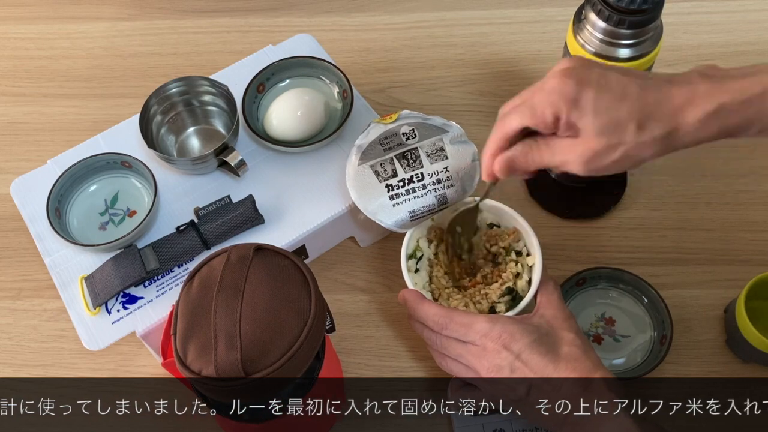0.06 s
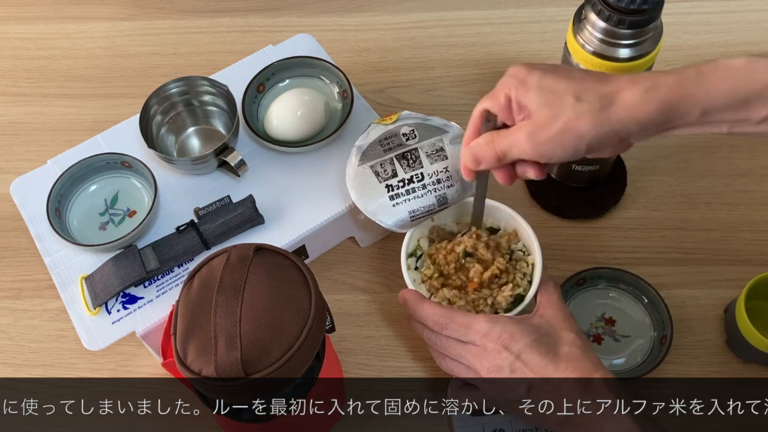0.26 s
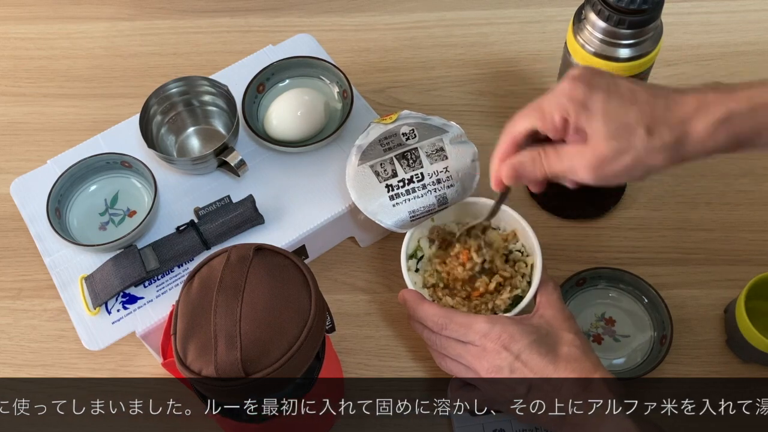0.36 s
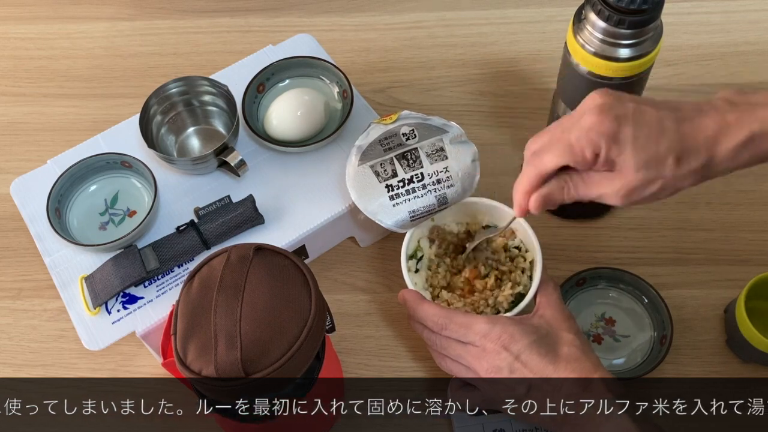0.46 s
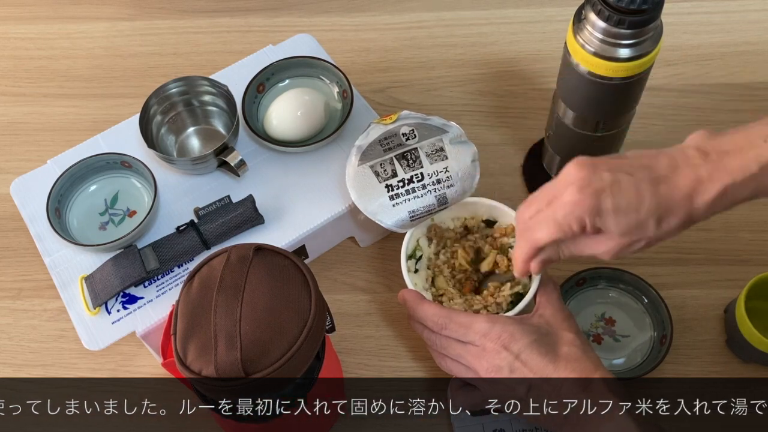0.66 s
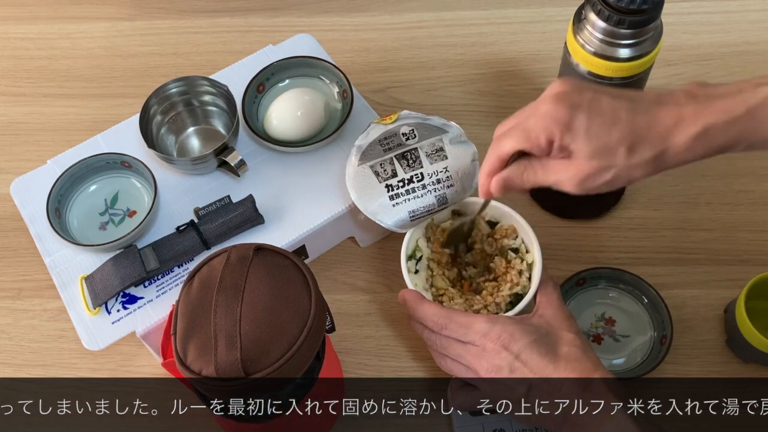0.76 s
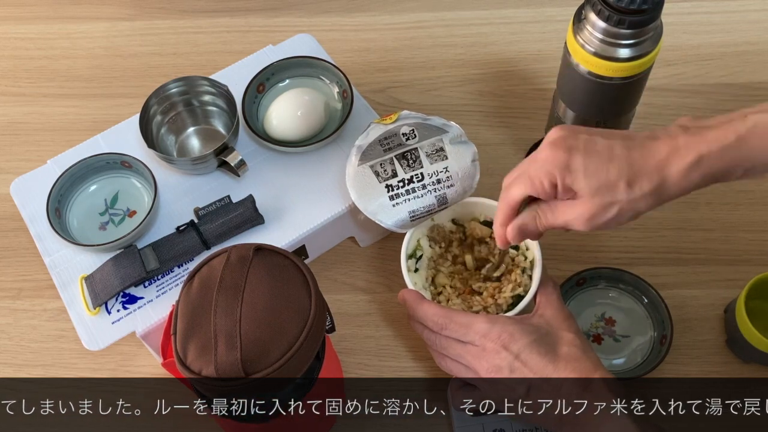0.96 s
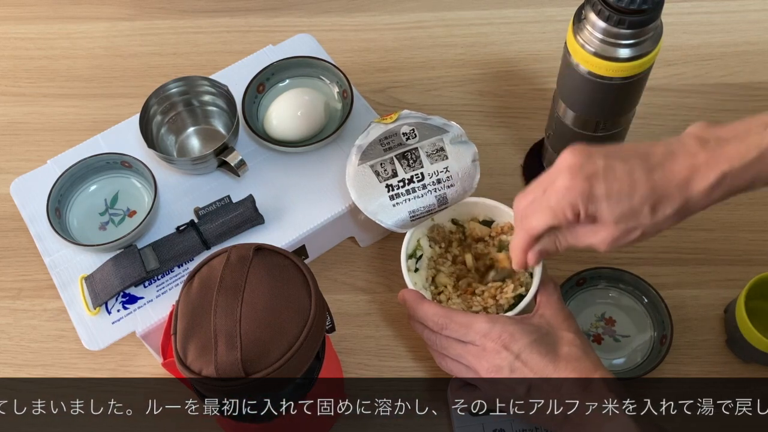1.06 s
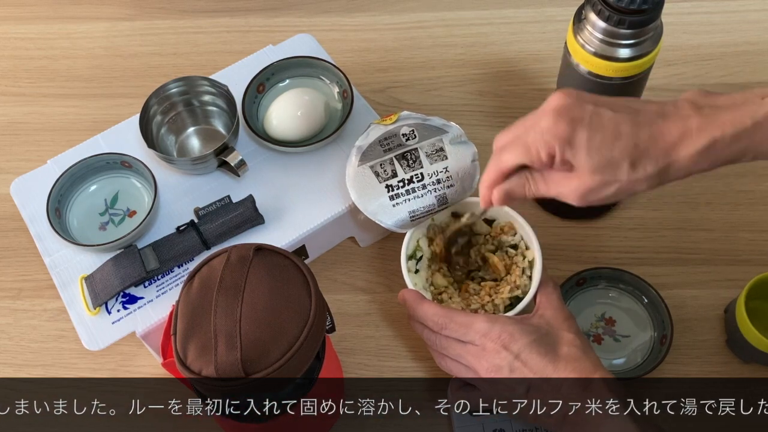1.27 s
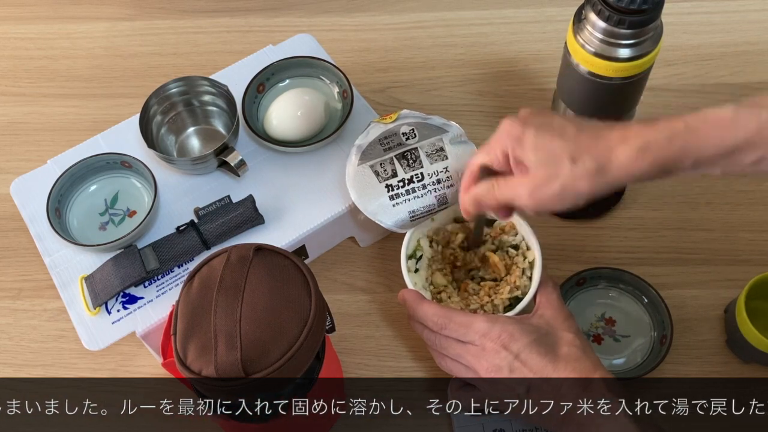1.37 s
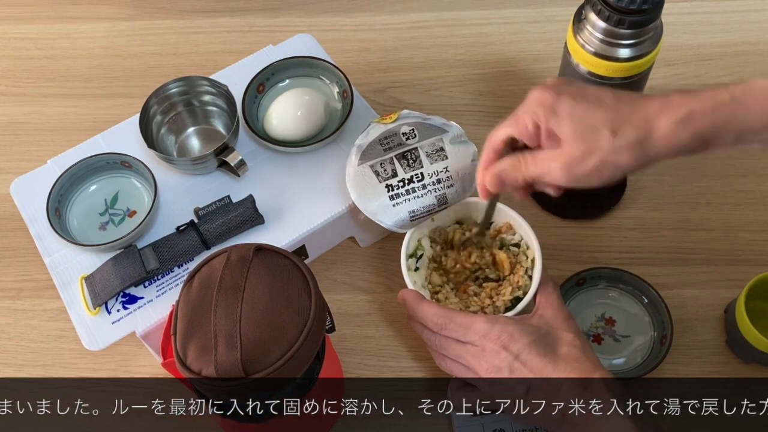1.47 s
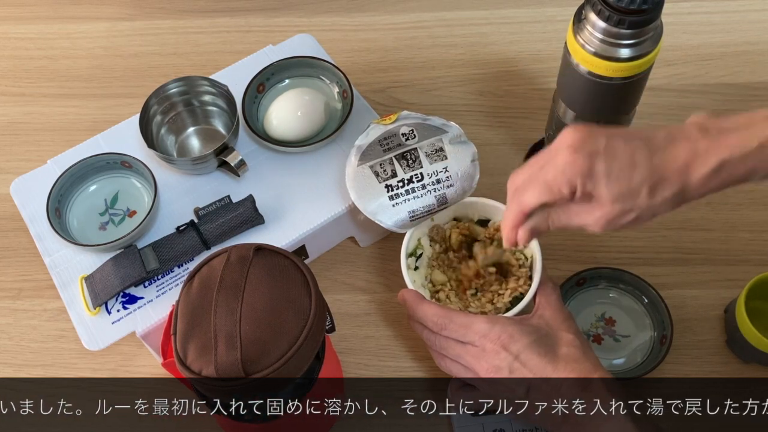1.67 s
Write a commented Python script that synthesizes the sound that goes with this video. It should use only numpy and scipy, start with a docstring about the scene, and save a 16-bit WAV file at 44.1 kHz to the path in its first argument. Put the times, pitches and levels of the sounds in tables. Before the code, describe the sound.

A spoon stirs moist rice in a paper cup, close by in a quiet room. Short scrapes and sharp ticks sound over the faint crackle of sticky grains, and near the end the cup bumps softly on the table.

```python
"""Stirring rice in a paper cup.

A spoon sticks and slips along the paper wall: short scrapes and sharp ticks ring the cup.
The moist rice churns and crackles as its sticky grains part. The cup presses on the table,
later bumps it, and the top thuds. The room is quiet, with a short tail."""
import sys
import numpy as np
from scipy import signal
from scipy.fft import rfft, irfft, next_fast_len
from scipy.io import wavfile

SR = 44100
rng = np.random.default_rng(int(sys.argv[2]) if len(sys.argv) > 2 else 0)


def digitize_waveform(pressure):
    """Quantize a signal to 16-bit integers and store it at the path in sys.argv[1].

    Rows of a 2-D input are taken as channels; values are limited to [-1, 1].
    """
    field = np.atleast_2d(pressure).T
    bounded = np.clip(field, -1, 1)
    quanta = np.round(bounded * 32767).astype(np.int16)
    wavfile.write(sys.argv[1], SR, quanta)


N = 74970
TIME_S = np.arange(N) / SR

# Spectra of room air, rice pops, rice churn. Each row: frequency in Hz, relative level in dB.
AIR_SPECTRUM = [(20, -38), (42, -26), (68, -4), (105, 0), (160, -4), (220, -3), (300, -6), (400, -13),
                (900, -22), (2000, -32), (6000, -33), (11000, -38), (16000, -31)]
CRACKLE_SPECTRUM = [(800, -16), (1600, -5), (2500, -1), (4500, -6), (6500, -7), (9000, -1), (11000, -9),
                    (13500, 0), (16000, 1)]
CHURN_SPECTRUM = [(40, -25), (150, -5), (300, 1), (600, 1), (900, -1), (1500, -8), (3000, -18), (8000, -32)]
# Envelopes of rice pops and churn. Each row: time in seconds, relative level in dB.
CRACKLE_ENVELOPE = [(0, -67), (.05, -67), (.09, -68), (.125, -59), (.195, -58), (.206, -50), (.225, -64),
                    (.285, -77), (.342, -63), (.385, -79), (.425, -66), (.452, -74), (.47, -60), (.5, -79),
                    (.555, -79), (.574, -67), (.592, -72), (.61, -65), (.68, -70), (.703, -63), (.735, -77),
                    (.77, -67), (.799, -70), (.806, -58), (.875, -70), (.896, -59), (.925, -77),
                    (.952, -58), (.985, -77), (1.05, -82), (1.08, -69), (1.225, -71), (1.245, -57),
                    (1.285, -81), (1.34, -55), (1.368, -68), (1.412, -54), (1.45, -72), (1.52, -79),
                    (1.548, -57), (1.59, -66), (1.65, -68), (1.672, -63), (1.7, -76)]
CHURN_ENVELOPE = [(0, -70), (.2, -67), (.35, -68), (.55, -70), (.63, -65), (.74, -72), (.84, -65),
                  (1.04, -71), (1.18, -68), (1.3, -72), (1.44, -65), (1.52, -70), (1.7, -68)]
# Spoon drags. Each row: peak time in seconds, relative rasp level in dB, rasp pitch in Hz,
# relative wall push in dB, rise and fall in seconds (each over 20 dB).
SPOON_DRAGS = [(.038, -53, 1900, -58, .007, .06), (.120, -52, 6500, -71, .03, .06),
               (.186, -55, 5500, -66, .13, .03), (.2085, -27, 4400, -38, .008, .016),
               (.342, -56, 3100, -68, .02, .025), (.422, -51, 4600, -64, .018, .035),
               (.468, -56, 5000, -69, .008, .03), (.538, -61, 3200, -76, .012, .02),
               (.616, -60, 2500, -59, .022, .08), (.672, -61, 3100, -72, .02, .05),
               (.806, -55, 2400, -60, .005, .11), (.892, -48, 2700, -69, .02, .025),
               (.954, -42, 4000, -67, .025, .027), (1.215, -56, 3500, -68, .05, .05),
               (1.2455, -42.5, 3800, -62, .013, .015), (1.334, -50, 2900, -59, .009, .04),
               (1.356, -54, 2000, -46, .005, .028), (1.418, -36.5, 3500, -47, .015, .028),
               (1.475, -57, 2700, -69, .02, .022), (1.554, -53, 3400, -61, .025, .032),
               (1.574, -55, 3000, -70, .01, .06), (1.666, -52.5, 2700, -54, .006, .04)]
# Spectra of paper rasp and hollow wall push. Each row: frequency in Hz, relative level in dB.
RASP_SPECTRUM = [(300, -16), (1000, -13), (1700, -10), (2350, 2), (3200, -.5), (4000, 0), (5500, -6),
                 (7500, -3), (9300, -1), (11000, -14), (16000, -9)]
PUSH_SPECTRUM = [(80, -15), (200, -3), (380, -9), (560, 1), (850, 0), (1020, -9), (1200, -1), (1900, -8),
                 (4000, -30)]
# Modes of cup plus spoon. Each row: frequency in Hz, relative gain in dB, T60 in seconds.
CUP_MODES = [(560, -2, .05), (720, 0, .05), (815, -1, .06), (1220, 4, .08), (2100, 2, .05), (2410, 1, .06),
             (2546, 5, .07), (2769, 0, .06), (3143, 1, .09), (3462, 2, .1), (3686, 3, .08), (4098, 5, .06),
             (4313, 2, .08), (4975, 2, .06), (6860, 5, .08), (7420, 2, .06), (7990, 5, .08), (9290, 3, .05)]
# Single slips, sticky pops, wall knocks. Each row: start in seconds, relative peak in dB, pitch in Hz.
WALL_TICKS = [(.1018, -37, 14500), (.1195, -37, 6000), (.1353, -31, 13500), (.2053, -15, 8000),
              (.2075, -14, 7200), (.2084, -15, 3900), (.2088, -28, 720), (.2099, -15.5, 3600),
              (.2135, -23, 3600), (.3393, -41, 4000), (.4028, -45, 4000), (.4188, -30, 4000),
              (.4268, -34, 7500), (.4630, -41, 6000), (.5995, -40, 13500), (.6955, -36, 14500),
              (.7003, -43, 8000), (.8035, -41, 7000), (.8085, -39, 4000), (.8853, -33, 2900),
              (.8932, -37, 3300), (.9514, -24, 3900), (1.0168, -46, 4200), (1.1085, -48, 4200),
              (1.1535, -49, 4500), (1.1755, -44, 3000), (1.2453, -30, 4000), (1.3293, -36, 3400),
              (1.3543, -34, 2600), (1.3580, -37, 1200), (1.4110, -34, 560), (1.4115, -25, 3500),
              (1.4158, -23, 3800), (1.4168, -27, 8500), (1.4207, -22.5, 3600), (1.4245, -24, 3600),
              (1.6010, -42, 4000), (1.6640, -44, 950), (1.6727, -34, 3600)]
# Cup presses or bumps on the table. Each row: start in seconds, strength in dB.
CUP_BUMPS = [(.220, -16), (1.356, 0)]
# Table top modes. Each row: frequency in Hz, relative level in dB, T60 in seconds.
TABLE_MODES = [(80, -35, .075), (108, -29, .075), (150, -33, .06), (219, -26, .08), (262, -35, .06)]
# Spectrum of the room tail. Each row: frequency in Hz, relative level in dB.
TAIL_SPECTRUM = [(100, -1), (600, 3), (1200, 7), (2200, -2), (5000, -3), (9000, -3), (16000, -4)]


def from_db(db):
    """Decibels to gain."""
    return 10 ** (np.asarray(db) / 20)


def unit_rms(x):
    """Scale to RMS 1."""
    return x / np.sqrt(np.mean(x ** 2) + 1e-20)


def colour(x, spectrum):
    """Minimum-phase filter with the given spectrum; white input keeps its level."""
    size = 4096
    hz, db = np.transpose(spectrum)
    bins_hz = np.arange(size // 2 + 1) * SR / size
    gain = unit_rms(from_db(np.interp(np.log(bins_hz + 1), np.log(hz), db)))
    cepstrum = irfft(np.log(gain))
    cepstrum[1:size // 2] *= 2
    cepstrum[size // 2 + 1:] = 0
    impulse = irfft(np.exp(rfft(cepstrum)))
    padded = next_fast_len(N + size)
    return irfft(rfft(x, padded) * rfft(impulse, padded), padded)[..., :N]


def resonate(x, hz, width_hz):
    """One resonance, peak gain 1."""
    radius = np.exp(-np.pi * width_hz / SR)
    feedforward = np.array([1, 0, -1]) * (1 - radius ** 2) / 2
    feedback = [1, -2 * radius * np.cos(2 * np.pi * hz / SR), radius ** 2]
    return signal.lfilter(feedforward, feedback, x + 1e-18)


def clicks(per_s, spread_db):
    """Random clicks of uneven size, RMS 1."""
    sizes = from_db(spread_db * np.minimum(rng.exponential(1, N), 4))
    return unit_rms(sizes * rng.choice([-1, 1], N) * (rng.random(N) < per_s / SR))


def flutter(per_s, depth_db):
    """Random gain with per_s knots a second, RMS 1."""
    knots = rng.standard_normal(N)
    return unit_rms(from_db(depth_db * np.interp(TIME_S * per_s, np.arange(N), knots)))


def widen(mid, side, side_db):
    """Mid and side to left and right."""
    return mid + from_db(side_db) * side * np.array([[1], [-1]])


def air(level_db=-62.5):
    """Low, steady room noise."""
    noise = widen(*rng.standard_normal((2, N)), side_db=-9)
    return from_db(level_db) * colour(noise, AIR_SPECTRUM)


def rice(crackle_gain_db=3.5):
    """Sticky grains part with tiny pops, in clumps, over the soft churn of the mass."""
    pops = widen(*[clicks(per_s=3800, spread_db=3.8) for _ in range(2)], side_db=-3)
    churn = widen(*[clicks(per_s=1500, spread_db=2.5) for _ in range(2)], side_db=-7)
    clumps = flutter(per_s=90, depth_db=2.3)
    pops *= clumps * from_db(crackle_gain_db + np.interp(TIME_S, *np.transpose(CRACKLE_ENVELOPE)))
    churn *= from_db(np.interp(TIME_S, *np.transpose(CHURN_ENVELOPE)))
    return colour(pops, CRACKLE_SPECTRUM) + colour(churn, CHURN_SPECTRUM)


def scrapes(rasp_gain_db=-4, roundness=1.25):
    """Each drag swells and dies: dense slips, uneven in grip, rasp the paper and push the wall."""
    slips = clicks(per_s=4500, spread_db=3) * flutter(per_s=400, depth_db=3)
    rasp = push = 0
    for peak_s, rasp_db, hz, push_db, rise_s, fall_s in SPOON_DRAGS:
        from_peak = np.maximum((peak_s - TIME_S) / rise_s, (TIME_S - peak_s) / fall_s)
        envelope = from_db(-20 * np.minimum(from_peak, 10) ** roundness)
        rasp += from_db(rasp_db) * envelope * unit_rms(resonate(slips, hz, width_hz=.75 * hz))
        push += from_db(push_db) * envelope
    hollow = colour(push * clicks(per_s=6000, spread_db=1.2), PUSH_SPECTRUM)
    return from_db(rasp_gain_db) * colour(rasp, RASP_SPECTRUM) + hollow


def cup(contact, direct_db=-1.5, ring_db=-4.5):
    """Contacts sound directly and through the cup's modes."""
    ring = sum(from_db(db) * resonate(contact, hz, width_hz=np.log(1000) / np.pi / t60_s)
               for hz, db, t60_s in CUP_MODES)
    return from_db(direct_db) * contact + from_db(ring_db) * ring


def ticks():
    """A single slip, pop or knock rings for about three cycles."""
    track, impulse = np.zeros(N + SR), signal.unit_impulse(1024)
    for start_s, db, hz in WALL_TICKS:
        width_hz = .64 * hz
        tick = resonate(resonate(impulse, hz, width_hz), hz, width_hz)
        start = int(start_s * SR)
        track[start:start + len(tick)] += from_db(db) * tick / np.abs(tick).max()
    return track[:N]


def bumps(contact_s=.009):
    """The cup's foot sets the table top thudding."""
    track = np.zeros(N)
    for start_s, strength_db in CUP_BUMPS:
        age_s = np.maximum(TIME_S - start_s, 0)
        thud = sum(from_db(strength_db + db - 60 * age_s / t60_s) * np.sin(2 * np.pi * hz * age_s)
                   for hz, db, t60_s in TABLE_MODES)
        track += thud * (1 - np.exp(-age_s / contact_s))
    return track


def room(x, t60_s=.14, onset_s=.003, gain_db=-14.5):
    """Short diffuse tail off the table and nearby walls."""
    envelope = from_db(-60 * TIME_S / t60_s) * (1 - np.exp(-TIME_S / onset_s))
    tail = rng.standard_normal((2, N)) * envelope
    tail /= np.sqrt(np.sum(tail[0] ** 2))
    wet = signal.fftconvolve(x[None], widen(*tail, side_db=0), axes=1)[:, :N]
    return from_db(gain_db) * colour(wet, TAIL_SPECTRUM)


def scene(pan_db=.7, port_hz=8000):
    """Cup slightly right; the two microphone ports fall out of phase around port_hz."""
    stirring = cup(scrapes() + ticks()) + bumps()
    phase_turned = stirring - 2 * resonate(stirring, port_hz, width_hz=2400)
    direct = np.array([stirring * from_db(-pan_db), phase_turned * from_db(pan_db)])
    return direct + room(stirring) + rice() + air()


def record(dry, low_cut_hz=60, high_cut_hz=16000):
    """Bass roll-off, steep top cut."""
    highpass = signal.butter(3, low_cut_hz, "high", fs=SR, output="sos")
    lowpass = signal.ellip(10, .1, 80, high_cut_hz, fs=SR, output="sos")
    return signal.sosfilt(lowpass, signal.sosfilt(highpass, dry))


dry = scene()
out = record(dry)
digitize_waveform(out)
```